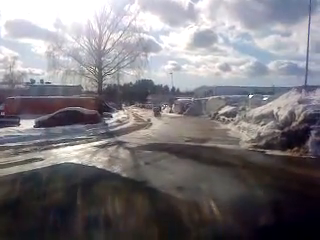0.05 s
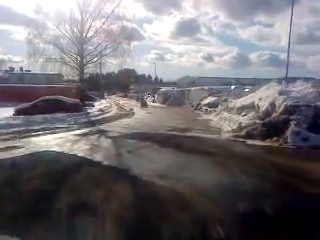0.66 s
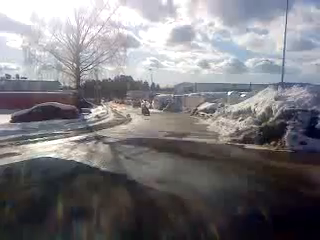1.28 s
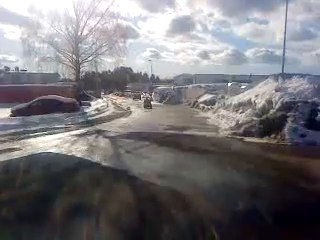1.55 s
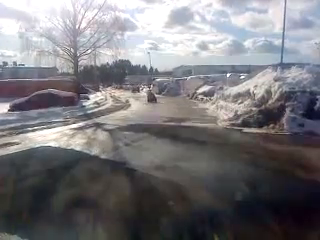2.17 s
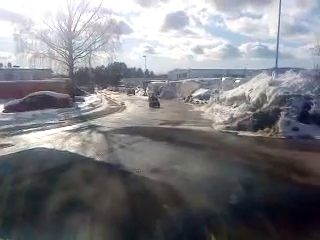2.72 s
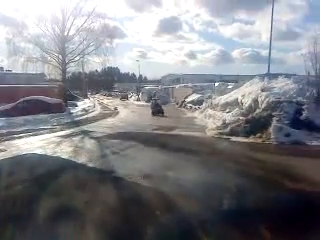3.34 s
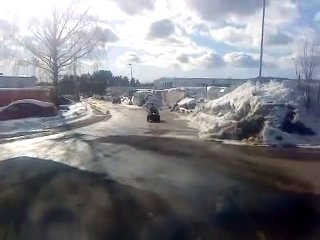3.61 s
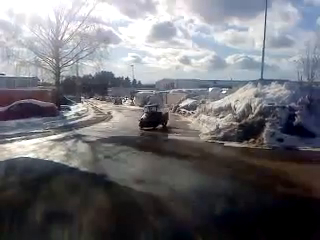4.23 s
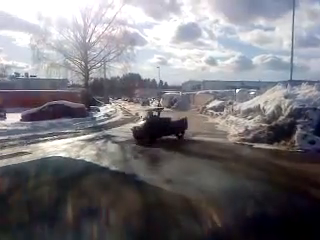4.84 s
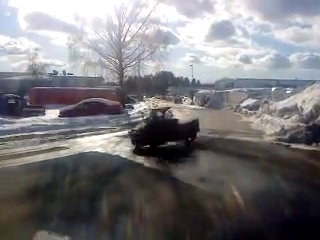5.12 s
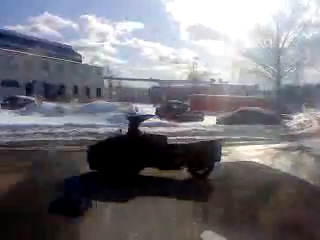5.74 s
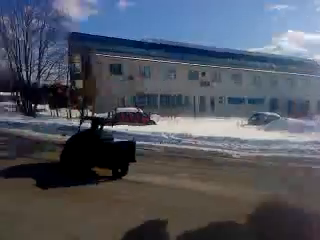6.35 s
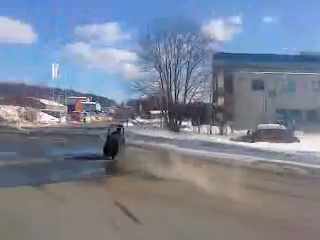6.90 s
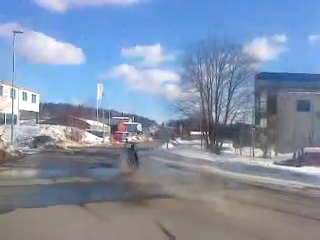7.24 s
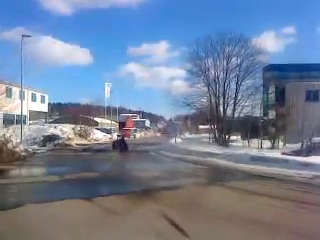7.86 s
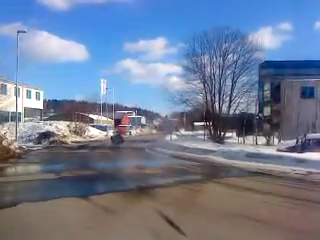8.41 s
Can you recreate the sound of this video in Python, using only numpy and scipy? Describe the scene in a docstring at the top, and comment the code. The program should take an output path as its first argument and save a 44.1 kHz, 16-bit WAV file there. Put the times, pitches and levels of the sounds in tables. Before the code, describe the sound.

Outdoors on a wet road, a distant moped engine lopes unevenly, popping and barking over a faint wind rumble. It revs up sharply, eases for a moment and accelerates past at close range with a loud, snarling howl that distorts a little on the microphone. Tyre spray hisses as it races away, the engine staying high and raspy with a metallic edge.

```python
"""A three-wheeled moped with a high-revving four-cylinder engine lopes far off, revs up, passes close
on a wet road and speeds away. One train of firings drives the exhaust: it booms and barks at low revs,
then fuses into a howl, a snarl and a rasp with a metallic zing. The tyres throw hissing spray,
light wind rumbles, and a small microphone overloads as the moped passes."""
import sys
import numpy as np
from scipy import signal
from scipy.fft import rfft, irfft
from scipy.io import wavfile
from scipy.ndimage import uniform_filter1d

SR = 44100
rng = np.random.default_rng(int(sys.argv[2]) if len(sys.argv) > 2 else 0)


def dump_mix(stems):
    """Bounce the given channels to the path in sys.argv[1] as a 16-bit WAV at rate SR."""
    frames = np.atleast_2d(stems).T  # one column per channel
    limited = np.clip(frames, -1, 1)  # hard clip at full scale
    pcm = np.round(limited * 32767).astype(np.int16)
    wavfile.write(sys.argv[1], SR, pcm)


N = 382788
TIME = np.arange(N) / SR
THROTTLE_S, THROTTLE_RISE_S = 3.31, 0.021

# The ride: puttering, revving up and easing, pulling away, flat out: (time [s], firing rate [Hz])
PUTTER = [(0, 76), (.24, 68.5), (.45, 56.3), (1.33, 53.2), (1.71, 61.3), (1.76, 56.2), (2.71, 62.3),
          (3.03, 53.3), (3.19, 55.5)]
FIRST_REV = [(3.31, 73), (3.38, 70.5), (3.49, 94.3), (3.65, 113), (3.74, 136), (3.81, 169), (3.87, 187),
             (4.07, 170), (4.33, 173.6), (4.88, 174.5), (4.94, 168.5), (5.04, 171.5), (5.24, 145.5)]
PULL_AWAY = [(5.35, 150), (5.47, 190), (5.726, 271.7), (5.87, 300)]
FLAT_OUT = [(6.0, 307), (6.38, 326), (6.66, 326.3), (6.74, 318.5), (7.28, 328), (7.44, 334), (7.93, 327.5),
            (8.02, 323.6), (8.33, 321), (8.5, 328)]
# Spells of stumbling: (start [s], end [s])
STUMBLES = [(0.219, 1.53), (2.788, 3.3)]
def revs():
    """The engine runs smoother as it speeds up; turns counts its firings so far."""
    speed = curves([*PUTTER, *FIRST_REV, *PULL_AWAY, *FLAT_OUT])[0]
    stumbling = sum(ramp(start, 0.12) - ramp(end, 0.12) for start, end in STUMBLES)
    misfire = np.clip(0.14 * (1 - speed / 350) + 0.723 * stumbling, 0, 1)
    turns = np.cumsum(speed * (1 + (0.00068 + 0.01219 * misfire) * wander(18.67))) / SR
    return speed, turns, stumbling, misfire


# The cylinders in firing order: (strength [dB], delay along the header [ms])
CYLINDERS = [(1.5, -0.012), (-0.5, 0.099), (-1.5, 0.0033), (1.5, 0.19)]
def firings(turns, misfire, scatter_db=7.0, limp=0.3, late_ms=1.1):
    """One sharp pulse a firing; a stumbling engine fires strong-weak and out of step."""
    at = np.flatnonzero(np.diff(np.floor(turns)))
    count = np.arange(len(at))
    db, delay_ms = np.array(CYLINDERS)[count % len(CYLINDERS)].T
    luck, lag = rng.standard_normal((len(at), 2)).T * misfire[at]
    size = amp(db + scatter_db * np.tanh(luck)) * (1 + limp * misfire[at] * (-1) ** count)
    due_s = np.interp(np.floor(turns[at + 1]), turns, TIME)
    fired_s = due_s + (delay_ms + late_ms * lag * misfire[at]) / 1000
    # a windowed sinc lands each pulse between samples
    taps = np.round(fired_s * SR).astype(int)[:, None] + np.arange(-6, 7)
    offset = taps - fired_s[:, None] * SR
    clicks = size[:, None] * np.sinc(offset) * np.cos(np.pi * offset / 14) ** 2
    out = np.zeros(N)
    np.add.at(out, np.clip(taps, 0, N - 1), clicks)
    return out


# How the moped faces us: (time [s], side [0 front, 1 flank, 2 and up tail pipe],
# turbulent share of the gas [0-1], snarl tones between the firing harmonics [dB])
HEADING = [(3.7, 0.6, 0.2, -15), (4.2, 0.064, 0.78, -8), (5.1, 0.052, 0.78, -12), (5.8, 1.28, 0.35, -16),
           (6.5, 0.86, 0.42, -11), (7.0, 1.24, 0.5, -3.5), (7.5, 4, 0.12, -6.5), (8.68, 4.3, 0.06, -2)]
PASS_S, PASS_WIDTH_S = 6.51, 0.63
def high_revs(pulses, turns, speed, behind):
    """Firings fuse to a howl; the gas turns from breathy to a clean buzz as the tail pipe swings round."""
    facing, turbulent, _ = curves(HEADING)
    near = 1 / (1 + ((TIME - PASS_S) / PASS_WIDTH_S) ** 2)
    buzz = steadied(echoes(pulses, wet_db=-5, t60=.12))
    gas = np.sqrt(1 - turbulent) * buzz + np.sqrt(turbulent) * puffs(pulses, decay=0.0072, steady=1.0)
    grit = rasp(gas, facing) + zing(gas, buzz, near)
    return howl(turns, speed, near, behind) + grit + rings(turns) + zing_surges(pulses, buzz)


# Exhaust modes: (pitch [Hz], width [Hz], level [dB], swell at the pass [dB], lift from behind [dB])
EXHAUST_MODES = [(120, 38, -16.5, 6.5, 5), (308, 112, -18.5, 11, 0), (588.4, 61, -35, 19.5, 16.5),
                 (694.8, 49.5, -26, -10.5, 18), (760, 220, -31.5, -4.5, -18.5)]
# Engine load pushing the howl's overtones: (time [s], gain [dB])
LOAD = [(3.85, 1.5), (4.35, -0.5), (4.88, -6.5), (5.08, 1), (5.28, -10), (5.43, 2), (5.65, 2)]
def howl(turns, speed, near, behind, count=4, throb_depth=0.42):
    """Each firing harmonic sings out as it crosses a mode of the exhaust."""
    load_db = curves(LOAD)[0]
    out = amp(-41.5 + 11 * near) * np.sin(np.pi * turns)  # unequal cylinders add a sub-octave
    for k in range(1, count + 1):
        power = 0
        for hz, width, db, near_db, behind_db in EXHAUST_MODES:
            detune = 2 * (k * speed - hz) / width
            power += (amp(db + near_db * near + behind_db * behind) / (1 + detune ** 2)) ** 2
        throb = 1 + throb_depth * (k / count) ** 2 * np.cos(np.pi * turns / 2)  # once an engine cycle
        waver_db = (1.6 - 1.1 * near) * np.sqrt(k) * wander(17.6)
        out += np.sqrt(power) * throb * amp(waver_db + load_db * (k > 1)) * np.sin(2 * np.pi * k * turns)
    return out


# The rasp's tone from three sides: (frequency [Hz], gain [dB])
FRONT = [(40, -63.5), (430, -35), (600, -6.5), (1000, -5.5), (1400, 3), (1650, 0.5), (2050, 5), (2400, -5),
         (3000, -3.5), (3800, -29.5), (6000, -62.5)]
FLANK = [(30, -36.5), (170, -6.5), (420, -11), (700, -7.5), (1100, -9.5), (1300, -4), (1650, -1.5),
         (2100, -4), (2900, -6.5), (3800, -15), (6000, -38.5)]
REAR = [(400, -28), (800, -15), (1120, -5.5), (1320, 6), (1650, 8), (2200, 6.5), (2800, -6), (3800, -10.5),
        (6000, -29)]
# The rasp's fader: (time [s], level [dB])
RASP_LEVEL = [(3.7, -50), (3.82, -22.5), (3.93, -31), (4.32, -17), (4.94, -15.5), (5.02, -21),
              (5.25, -18.5), (6.06, -14), (7.43, -26.5), (7.96, -18)]
def rasp(gas, facing):
    """Exhaust gas rasps, its tone crossfading from front to flank to rear as the moped turns."""
    side = np.clip(facing, 0, 2)
    blend = sum(np.maximum(1 - abs(side - k), 0) * colour(gas, tone)
                for k, tone in enumerate([FRONT, FLANK, REAR]))
    return steadied(blend) * amp(curves(RASP_LEVEL)[0] + 1.1 * wander(18))


# The zing's tone: (frequency [Hz], gain [dB])
ZING_TONE = [(2400, -31), (3400, 6.5), (4000, 7), (4500, 4.5), (5100, 3), (6200, -36.5)]
def zing(gas, buzz, near):
    """A metallic edge rides on the rasp's level and gains on it at the pass."""
    metal = colour(gas + 0.23 * buzz, ZING_TONE)
    ring = resonate(metal, hz=np.full(N, 3960), width=800)
    level_db = curves(RASP_LEVEL)[0] - 18 + 8.5 * near + 1.6 * wander(17)
    return steadied(steadied(metal) + 0.5 * steadied(ring)) * amp(level_db)


# Brief rings of the exhaust: (time [s], length [s], level [dB], firing harmonic [number])
RINGS = [(6.6, 0.067, -23, 5), (7.02, 0.15, -25, 4), (8.118, 0.18, -27.5, 5)]
def rings(turns):
    """One firing harmonic at a time catches a resonance of the exhaust and rings out roughly."""
    return sum(amp(db + 4.4 * wander(60)) * swell(s, length) * np.sqrt(2) * np.cos(2 * np.pi * k * turns)
               for s, length, db, k in RINGS)


# Surges of the zing on the way out: (time [s], length [s], level [dB], centre [Hz], width [Hz])
ZING_SURGES = [(6.96, .12, -27, 4250, 900), (7.08, 0.094, -21, 4170, 1100), (7.102, 0.33, -28.5, 4476, 70),
               (7.29, 0.1, -20, 4150, 1100), (8.062, 0.13, -23, 3800, 1110),
               (8.097, 0.54, -29.5, 5020, 400), (8.458, 0.074, -21.5, 3800, 1100)]
def zing_surges(pulses, buzz):
    """The engine's high metallic buzz surges in bursts, with a thin whine."""
    chopped = buzz + .45 * puffs(pulses, decay=.0007, steady=.1)
    return sum(amp(db) * swell(s, length) * steadied(band(chopped, hz, width))
               for s, length, db, hz, width in ZING_SURGES)


# The snarl's tone, a low hum and a strong peak near 700 Hz: (frequency [Hz], gain [dB])
SNARL_TONE = [(42, -58), (82, -4.5), (170, 3), (260, -1), (410, -37), (520, 0), (600, 0.5), (700, 14.5),
              (790, 9), (880, 8.5), (980, 3.5), (1300, -2), (2600, -14)]
# The snarl's fader: (time [s], level [dB])
SNARL_LEVEL = [(3.3, -33.5), (3.8, -24.5), (4.45, -25), (4.9, -29), (5.6, -22), (6.2, -21), (6.6, -23.5),
               (7.2, -22.5), (7.5, -19), (8.15, -23.5), (8.68, -21.5)]
def snarl(turns, speed, count=44, shade_above_hz=860):
    """Unequal cylinders add tones at quarters of the firing rate, which swell and fade as they sweep."""
    facing, _, between_db = curves(HEADING)
    shade_db = -4 * np.clip(1 - facing, 0, 1)  # duller from the front
    jitter_s = 35e-6 * wander(120)
    out = np.zeros(N)
    for k in range(1, count):
        if k in (2, 4, 8):  # left to the howl
            continue
        order, between = k / len(CYLINDERS), k % len(CYLINDERS) > 0
        hz = speed * order
        db = np.interp(hz, *np.transpose(SNARL_TONE)) + between_db * between
        db += shade_db * np.clip((hz - shade_above_hz) / 100 + .5, 0, 1)
        db += 3.8 * wander(20.3)
        out += amp(db) * np.sin(2 * np.pi * (turns * order + jitter_s * hz + rng.random() * between))
    return steadied(out) * amp(curves(SNARL_LEVEL)[0])


# The tail pipe's tone: (frequency [Hz], gain [dB])
TAIL_TONE = [(1130, -5.5), (1310, 2), (1660, 4), (1900, 2), (2200, 3.5), (3200, -15.5)]
# Its faders: (time [s], level [dB], quarter-order tones [dB])
TAIL_LEVEL = [(5.4, -44, -14), (6.3, -27, -12), (7.3, -27, -14), (7.8, -22.5, -14), (8.0, -20.5, -5),
              (8.68, -20.5, -6)]
def tail_buzz(turns, speed, count=41, half_order_db=-2.5):
    """The tail pipe's clean overtones: firing harmonics lock into pulses, with looser tones between."""
    level_db, quarter_db = curves(TAIL_LEVEL)
    out = np.zeros(N)
    for k in range(14, count):
        order, step = k / len(CYLINDERS), k % len(CYLINDERS)
        db = np.interp(speed * order, *np.transpose(TAIL_TONE))
        db += [0, quarter_db, half_order_db, quarter_db][step] + 2.8 * wander(9.5)
        out += amp(db) * np.cos(2 * np.pi * (turns * order + rng.random() * (step > 0)))
    return steadied(out) * amp(level_db)


# The booming pipe, its ringing chamber and the barking silencer: (frequency [Hz], gain [dB])
PIPE = [(20, -32.5), (45, -13), (61, -9), (72, 10), (92, 6.5), (122, 3.5), (146, -1.5), (190, -20.5),
        (900, -77)]
CHAMBER = [(110, -30), (175, -13), (236, -2), (288, 3), (362, -10), (440, -34), (3000, -100)]
SILENCER = [(480, -17.5), (560, 1), (610, 1.5), (660, -4), (720, 0.5), (790, -14), (950, -20), (1500, -48),
            (6000, -75)]
# Their faders: (time [s], boom [dB], chamber ring [dB], bark [dB])
LOW_REV_LEVELS = [(0.18, -21, -37, -34.5), (0.27, -22, -29.5, -31.5), (1.5, -21, -24.5, -34),
                  (1.69, -18, -23.5, -27.5), (1.8, -21, -25, -31), (2.35, -17, -27, -30),
                  (2.76, -21, -24.5, -25), (2.81, -19.5, -33, -33.5), (2.92, -26, -22, -33.5),
                  (3.02, -17.5, -26.5, -32.5), (3.28, -18, -24.5, -29.5), (3.45, -14, -19.5, -30.5)]
def low_revs(pulses, turns, speed, stumbling, misfire, throttle):
    """Firings boom in the pipe, ring in its chamber and bark in the silencer; stumbling adds a burble."""
    boom_db, chamber_db, bark_db = curves(LOW_REV_LEVELS)
    echoed = steadied(echoes(pulses, wet_db=-12, t60=.2))
    burble = misfire ** 2 * puffs(pulses, decay=.008, steady=.5)
    gas = .75 * burble - echoed
    boom = steadied(colour(gas, PIPE), span=0.028) * amp(boom_db)
    boom *= 1 - ramp(3.81, 0.067)  # the firings outrun the pipe's resonance
    chamber = steadied(colour(gas, CHAMBER), span=0.063) * amp(chamber_db)
    lope = 1 + 0.15 * (1 - throttle) * np.cos(2 * np.pi * turns / len(CYLINDERS))
    breathy_gas = echoes(echoed, wet_db=-2, t60=.08) + 3.2 * burble + 0.52 * puffs(pulses)
    bark = steadied(colour(lope * breathy_gas, SILENCER), span=0.04) * amp(bark_db)
    return boom + chamber + bark + pops() + clatter(pulses, echoed, speed, stumbling, throttle)


# Pops of the stumbling engine: (time [s], bark peak [dB], thump peak [dB])
POPS = [(0.031, -19, -38), (0.135, -19, -27), (0.207, -23, -13.5), (0.222, -19.5, -43), (0.415, -39, -14),
        (0.495, -24, -15), (0.858, -19, -24), (2.975, -22, -23), (3.293, -16.5, -21)]
def pops():
    """Sudden hard firings, each a short push of gas into the silencer and the pipe."""
    click = signal.unit_impulse(N)
    bark, thump = colour(click, SILENCER), colour(click, PIPE) + colour(click, CHAMBER)
    bark, thump = bark / abs(bark).max(), thump / abs(thump).max()
    return sum(np.pad(amp(bark_db) * bark - amp(thump_db) * thump, (int(s * SR), 0))[:N]
               for s, bark_db, thump_db in POPS)


# The crack's tone: (frequency [Hz], gain [dB])
BITE_TONE = [(400, -34.5), (750, -12), (1350, 4.5), (2100, 2.5), (5000, -33.5)]
# Its fader: (time [s], level [dB])
BITE_LEVEL = [(3.25, -75), (3.35, -38), (3.75, -27.5), (3.83, -23), (3.9, -38), (4.9, -26.5), (5.28, -32),
              (5.55, -23.5), (6.8, -33)]
def bite(pulses):
    """Under load each firing cracks sharply, straight from the engine."""
    return -steadied(colour(pulses, BITE_TONE)) * amp(curves(BITE_LEVEL)[0])


# The clatter's tone: (frequency [Hz], gain [dB])
CLATTER_TONE = [(500, -21), (900, -8), (1250, 4.5), (2200, 2.5), (2700, -5), (4200, -10.5), (5500, -33)]
# Its level: (base [dB], approach [dB/s], stumbling [dB], open throttle [dB], revs [dB/octave])
CLATTER_LEVEL = (-41, 1.02, -1, 8.5, 0)
def clatter(pulses, echoed, speed, stumbling, throttle, idle_hz=60.3):
    """The engine clatters at low revs: pulsing noise with a little clean firing buzz."""
    level_db = np.array(CLATTER_LEVEL) @ [np.ones(N), TIME, stumbling, throttle, np.log2(speed / idle_hz)]
    rattle = puffs(pulses, decay=0.0057, steady=3.4) + 0.3 * echoed
    return steadied(colour(rattle, CLATTER_TONE)) * amp(level_db)


# The sizzle's fader: (time [s], level [dB])
SIZZLE_LEVEL = [(6.2, -77.5), (6.9, -36.5), (7.45, -41), (7.89, -34), (8.68, -51)]
def sizzle(pulses, flicker_db=4.5):
    """The very top of the exhaust: a spit of gas at each firing, coming in spurts."""
    spit = band(puffs(pulses, decay=.0005, steady=.05), hz=7500, width=1150)
    return steadied(spit) * amp(curves(SIZZLE_LEVEL)[0] + flicker_db * wander(16))


# The wet road's hiss: (frequency [Hz], gain [dB])
SPRAY_TONE = [(1500, -11), (3500, 0), (6200, -5.5), (7500, -7.5), (8500, -22)]
# Its fader: (time [s], level [dB])
SPRAY_LEVEL = [(0, -41), (.53, -38), (1.06, -54.5), (3.31, -49.5), (3.34, -39.5), (4.27, -31.5),
               (5.1, -33.5), (5.85, -25.5), (7.3, -25.5), (8.68, -24.5)]
def spray(pulses, behind, drops_per_s=900):
    """Water hisses off the tyres in spurts, with single drops and, from behind, the exhaust's top buzz."""
    drops = (rng.random(N) < drops_per_s / SR) * amp(5 * np.minimum(rng.exponential(1, N), 4))
    hiss = 1.42 * rng.standard_normal(N) + 0.71 * evened(drops)
    hiss += .5 * puffs(pulses, decay=0.00055, steady=0.17)
    hiss += behind * steadied(echoes(pulses, wet_db=0.5, t60=0.17))
    return steadied(colour(hiss, SPRAY_TONE)) * amp(curves(SPRAY_LEVEL)[0] + 1.6 * wander(6.6))


# The wind's rumble: (frequency [Hz], gain [dB])
WIND_TONE = [(15, -11.5), (40, -15), (85, -2), (450, -16), (2000, -54.5)]
# Its fader: (time [s], level [dB])
WIND_LEVEL = [(3.3, -33), (3.6, -58), (4.0, -72), (6.5, -42), (7.2, -60)]
def wind(gust_db=3):
    """Light gusts rumble on the microphone."""
    rumble = evened(colour(rng.standard_normal(N), WIND_TONE))
    return rumble * amp(curves(WIND_LEVEL)[0] + gust_db * wander(7.3))


def puffs(pulses, decay=0.0011, steady=.3):
    """Turbulent gas: a burst of noise after each firing, over a steady flow."""
    burst = signal.lfilter([1], [1, -np.exp(-1 / (decay * SR))], pulses)
    return steadied((steadied(burst) + steady) * rng.standard_normal(N))


def echoes(x, wet_db, t60):
    """Adds scattered echoes from snow banks, cars and walls."""
    t = TIME[:SR // 2]
    taps = rng.standard_normal(len(t)) * (rng.random(len(t)) < .04) * amp(-60 * t / t60) * (t > .004)
    return x + amp(wet_db) * signal.oaconvolve(x, taps / np.linalg.norm(taps))[:N]


def colour(x, points):
    """Minimum-phase EQ through the given points."""
    hz, db = np.transpose(points)
    log_gain = np.interp(np.log(np.fft.rfftfreq(8192, 1 / SR) + 1), np.log(hz), db) * np.log(10) / 20
    cepstrum = irfft(log_gain)
    half = len(cepstrum) // 2
    cepstrum[1:half] *= 2
    cepstrum[half + 1:] = 0
    return signal.oaconvolve(x, irfft(np.exp(rfft(cepstrum)))[:half])[:N]


def resonate(x, hz, width):
    """A resonance that follows the curve hz."""
    turn, r = np.exp(2j * np.pi * np.cumsum(hz) / SR), np.exp(-np.pi * width / SR)
    return (turn * signal.lfilter([(1 - r) ** 2], [1, -2 * r, r * r], x / turn)).real


def band(x, hz, width):
    """A steep-sided band around hz."""
    edges = [hz - width / 2, hz + width / 2]
    return signal.sosfilt(signal.butter(3, edges, "bandpass", fs=SR, output="sos"), x)


def wander(hz, size=32):
    """Random drift of unit power, up to the given rate."""
    t = TIME[::size]
    roll_off = 1 + (np.fft.rfftfreq(len(t), size / SR) / hz) ** 4
    slow = irfft(rfft(rng.standard_normal(len(t))) / roll_off, len(t))
    return evened(np.interp(TIME, t, slow))


def curves(rows):
    """Each column of a table as a curve in time."""
    s, *columns = np.transpose(rows)
    return [np.interp(TIME, s, column) for column in columns]


def ramp(s, length):
    """Rises from 0 to 1 around the time s."""
    return np.clip((TIME - s) / length + .5, 0, 1)


def swell(s, length):
    """A smooth swell that peaks at the time s."""
    return np.exp(-2 * ((TIME - s) / length) ** 2)


def amp(db):
    """Decibels to gain."""
    return 10 ** (np.asarray(db) / 20)


def evened(x):
    """Scales to unit power."""
    return x / np.sqrt(np.mean(x ** 2) + 1e-20)


def steadied(x, span=0.18):
    """Holds the running power at one."""
    size = max(int(span * SR), 8)
    return x / np.sqrt(abs(uniform_filter1d(uniform_filter1d(x ** 2, size), size)) + 1e-12)


def scene():
    """The engine passes from single booms to a snarl and a howl as the throttle opens."""
    speed, turns, stumbling, misfire = revs()
    pulses = firings(turns, misfire)
    throttle = ramp(THROTTLE_S, THROTTLE_RISE_S)
    behind = np.clip(curves(HEADING)[0] - 1, 0, 1)
    crossfade = np.pi / 2 * ramp(3.78, 0.25)
    engine = np.cos(crossfade) * low_revs(pulses, turns, speed, stumbling, misfire, throttle)
    engine += np.sin(crossfade) * high_revs(pulses, turns, speed, behind)
    engine += throttle * snarl(turns, speed)
    throb = 1 + 0.4 * behind * np.cos(np.pi * turns / 2)  # the treble throbs once an engine cycle
    engine += bite(pulses) + tail_buzz(turns, speed) + throb * sizzle(pulses)
    return (engine + spray(pulses, behind * throb) + wind())[None]


def record(dry, ceiling=.49, knee=5, cutoff_hz=8550):
    """The microphone flattens the loudest peaks; a steep low-pass takes off the top."""
    squashed = dry / (1 + abs(dry / ceiling) ** knee) ** (1 / knee)
    low_pass = signal.firwin(201, cutoff_hz, window=("kaiser", 8), fs=SR)
    return signal.oaconvolve(squashed, low_pass[None], "same")


dry = scene()
out = record(dry)
dump_mix(out)
```